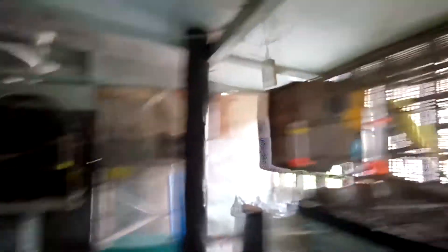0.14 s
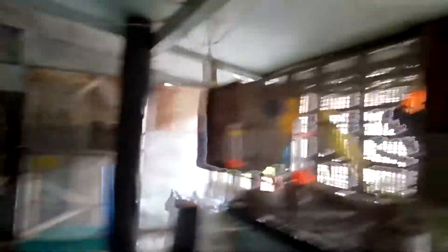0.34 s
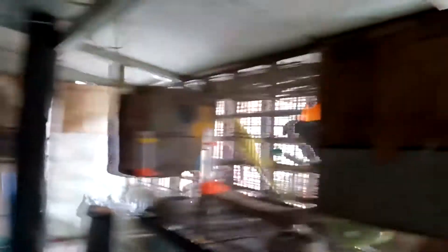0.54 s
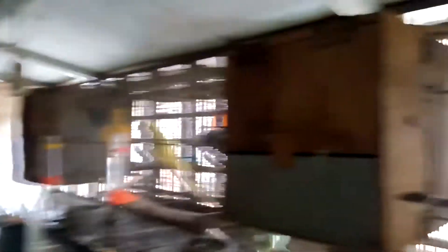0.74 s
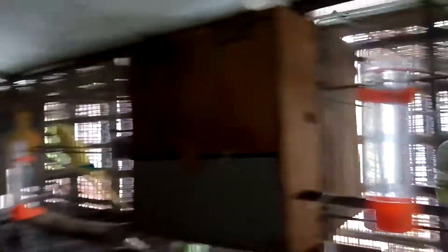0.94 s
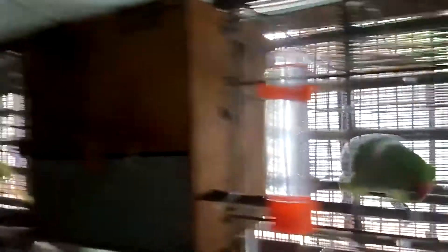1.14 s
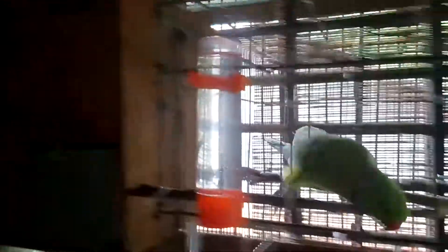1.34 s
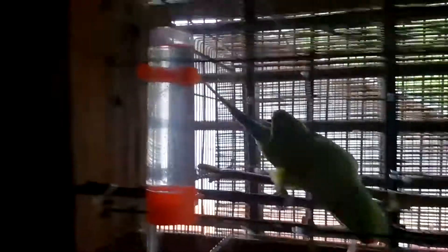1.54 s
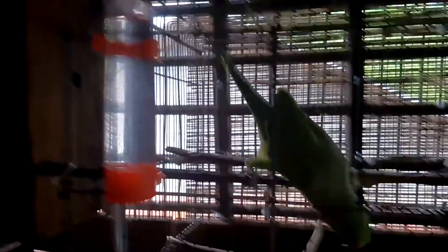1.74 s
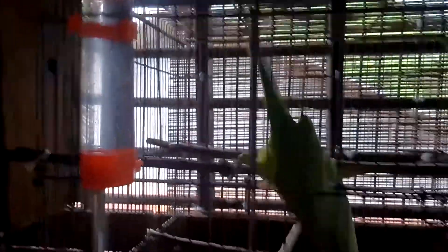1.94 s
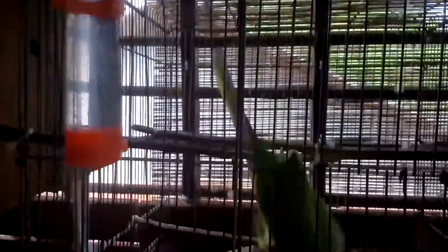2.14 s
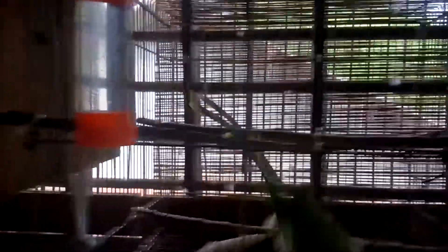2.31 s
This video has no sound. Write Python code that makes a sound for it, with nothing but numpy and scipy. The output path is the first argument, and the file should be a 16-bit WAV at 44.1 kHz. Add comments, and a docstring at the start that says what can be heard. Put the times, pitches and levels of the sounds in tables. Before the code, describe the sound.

Two piercing, raspy parakeet squawks in a hard-walled aviary, followed by a fainter bird call and distant barks

```python
"""In a hard-walled aviary a parakeet squawks twice and a second bird answers with a clearer call.
A dog barks far off, claws tick on cage wire, and a low rumble with hiss lies below.
Birds and dog are stacks of harmonics with breath noise; ticks are short rings; the bed is banded noise.
Two spaced microphones hear it; the recorder's gain control ducks everything under the squawks."""
import sys
import numpy as np
from scipy import signal
from scipy.fft import rfft, irfft, next_fast_len
from scipy.io import wavfile
from scipy.ndimage import uniform_filter1d

SR = 44100
rng = np.random.default_rng(int(sys.argv[2]) if len(sys.argv) > 2 else 0)


def dump(signal):
    """Clip the signal to [-1, 1] and save it as 16-bit WAV at the path in sys.argv[1]."""
    limited = np.clip(np.atleast_2d(signal).T, -1, 1)
    pcm = np.round(limited * 32767).astype(np.int16)
    wavfile.write(sys.argv[1], SR, pcm)


N = 104649  # samples
LEAD_S = .1


def amp(db):
    """Decibels to linear gain."""
    return 10 ** (np.asarray(db) / 20)


def rms_one(x):
    """Scale to an RMS of 1."""
    return x / np.sqrt(np.mean(x ** 2) + 1e-20)


def at_hz(points, hz):
    """Read a curve of (frequency, value) points, straight along log frequency."""
    points_hz, values = np.transpose(points)
    return np.interp(np.log(np.maximum(hz, 1)), np.log(np.maximum(points_hz, 1)), values)


def clock():
    """Time axis in seconds, starting a little early so that the room is already ringing."""
    return np.arange(-int(LEAD_S * SR), N) / SR


def drift(hz, size):
    """Slow random motion: noise through a double one-pole low-pass, spread about 1."""
    r = np.exp(-2 * np.pi * hz / SR)
    settle = SR // 4
    noise = rng.standard_normal(size + settle)
    return rms_one(signal.lfilter([1], [1, -2 * r, r * r], noise)[settle:])


def colour(x, db_at, lag_s=0.):
    """Shape the spectrum by a gain curve and delay the sound."""
    size = next_fast_len(x.shape[-1] + 2048)
    hz = np.fft.rfftfreq(size, 1 / SR)
    delay = np.exp(-2j * np.pi * hz * lag_s)
    return irfft(rfft(x, size) * amp(db_at(hz)) * delay, size)[..., :x.shape[-1]]


NOTE_EDGE_S, WAVER_HZ = 0.0029, 70
JITTER_TURNS, JITTER_HZ, PULSE_DB, PULSE_HZ = .14, 300, 8, 400  # depths at full roughness


def voice(rows, orders, waver, breath_db):
    """Harmonics on a pitch curve; roughness shakes the phase and pulses the level; breath hisses along."""
    t = clock()
    s, *columns = np.transpose(rows)
    on = (t >= s[0]) & (t < s[-1])
    hz, db, rough, slope_db = [np.interp(t[on], s, c) for c in columns]
    rough, size = np.clip(rough, 0, 1), on.sum()

    # phase in turns: the wavering pitch added up, then shaken
    wavering_hz = hz * (1 + waver * drift(WAVER_HZ, size))
    turns = np.cumsum(wavering_hz) / SR + JITTER_TURNS * rough * drift(JITTER_HZ, size)

    k, order_db = np.transpose(orders)[:, :, None]
    gains = amp(order_db + slope_db * (k - 1)) * (k * hz < .45 * SR)
    even_power = np.sqrt(2 / np.sum(gains ** 2, axis=0))  # slope changes timbre, not loudness
    tone = np.sum(gains * np.sin(2 * np.pi * k * turns), axis=0) * even_power
    tone += amp(breath_db) * rng.standard_normal(size)

    edge = np.clip(np.minimum(t[on] - s[0], s[-1] - t[on]) / NOTE_EDGE_S, 0, 1)
    pulse_db = PULSE_DB * rough * (np.tanh(drift(PULSE_HZ, size)) - 1.0)  # only ever lowers the level
    out = np.zeros(len(t))
    out[on] = tone * edge * amp(db + pulse_db)
    return out


# Notes of the two squawks, the voice jumping between registers; level is before roughness lowers it:
# start_s, pitch_hz, level_db, roughness (0-1), overtone_slope_db (per harmonic)
SQUAWK_NOTES = [
    [(-.1, 1351, 9, 0, 3), (-.03, 1893, 0, 0.85, -19), (-.01, 2601, 15, 0.9, -4.5)],
    [(-.01, 3590, 3, 0.2, 1.5), (.015, 3618, -8, 0.2, -1.5), (.035, 3884, 14, 0.25, -0.5)],
    [(.03, 5000, -9, 0.1, -19), (.044, 5213, 6, 0.07, -11), (.064, 5140, 4.5, 0.3, 5),
     (.072, 5020, 1.5, 0.4, -5), (.084, 4720, -6, 0.2, -4), (.095, 3740, -1, .35, 5.5)],
    [(.097, 3786, -0.5, 0.16, 3), (.115, 3613, -1, 0.17, -17), (.132, 3624, -3, 0.17, 3.5),
     (.155, 3422, 0, 0.22, -21)],
    [(.152, 3235, 11.5, 0.65, 3.5), (.175, 2550, -7.5, 0.9, -2.5), (.2, 2216, 4, 0.94, -2),
     (.225, 1807, -5, 0.77, 1), (.24, 1760, -16, 0.9, -13.5)],
    [(.421, 734, -11, 0.9, -3.5), (.432, 1187, -18.5, 0.86, -0.5), (.445, 1320, -5, 0.7, 0),
     (.47, 1334, -7, 0.7, -1), (.485, 1857, 6.5, 0.72, 0.5), (.5, 2367, -1, 0.67, -2.5),
     (.512, 2450, 1.5, 0.45, -3.5), (.523, 2567, 11.5, 0.54, 2.5)],
    [(.525, 3427, -9.5, 0.2, -4), (.55, 3390, -2.5, 0.2, -7), (.562, 3402, 3.5, 0.2, -11),
     (.572, 3240, 6, .15, -12)],
    [(.572, 2510, 6.5, 0.17, -1.5), (.596, 2208, -1.5, 0, -1.5), (.62, 2026, -2.5, 0.29, -0.5),
     (.64, 1831, -3.5, 0, -2), (.655, 1743, -5, 0.37, 0), (.672, 1557, -7, 0.42, -2)],
]
# Colour of throat, beak and microphone: frequency_hz, gain_db
SQUAWK_COLOUR = [(600, -24), (1300, -16), (2400, -12.5), (3500, 6), (5000, 2.5), (6600, -3.5), (7500, -13),
                 (10500, -19), (12500, -38), (14000, -29), (15200, -15)]
SQUAWK_WAVER, SQUAWK_BREATH_DB = .011, -21  # share of pitch; turbulence against the voice


def parakeet():
    """Two squawks of up to twelve harmonics; all notes share one colour of throat, beak and microphone."""
    even = [(k, 0) for k in range(1, 13)]
    notes = sum(voice(rows, even, SQUAWK_WAVER, SQUAWK_BREATH_DB) for rows in SQUAWK_NOTES)
    return colour(notes, lambda hz: at_hz(SQUAWK_COLOUR, hz))


# Answering call in two notes; level is before roughness lowers it:
# start_s, pitch_hz, level_db, roughness (0-1), overtone_slope_db (per harmonic)
ANSWER_NOTES = [
    [(.74, 1408, -38, 0.2, -30), (.755, 1388, -35.5, 0.2, -4), (.79, 1341, -29.5, 0.1, -0.5),
     (.814, 1327, -23, .06, 0.5), (.846, 1352, -26, 0.11, -0.5), (.862, 1377, -19, 0.14, -0.5)],
    [(.858, 1377, -25.5, 0.19, -2), (.874, 1423, -25.5, 0.07, -0.5), (.914, 1394, -18, .06, 1.5),
     (.94, 1418, -29.5, 0, -20.5), (.955, 1410, -18.5, 0.12, -0.5), (.975, 1311, -31, 0.12, -3.5),
     (.99, 1278, -30.5, 0.1, -7)],
]
# Harmonic mix before and after the step up in pitch: harmonic (number), gain_db
ANSWER_HARMONICS = [
    [(1, -14.5), (2, -6.5), (3, 0.5), (4, 2.5), (5, -11), (6, -15), (7, -23.5), (8, -49)],
    [(1, -21), (2, 1.5), (3, -7.5), (4, -4), (5, -15.5), (6, -22.5), (7, -46), (8, -38)],
]
ANSWER_WAVER, ANSWER_BREATH_DB = .004, -42  # share of pitch; turbulence against the voice


def answering_bird():
    """A steadier, less breathy voice whose harmonic mix changes with the second note."""
    return sum(voice(rows, orders, ANSWER_WAVER, ANSWER_BREATH_DB)
               for rows, orders in zip(ANSWER_NOTES, ANSWER_HARMONICS))


# Far barks, pitch and level at the top of the arch, before roughness lowers the level:
# start_s, length_s, pitch_hz, level_db
BARKS = [(0.723, 0.065, 641, -42), (0.952, 0.13, 608, -44), (1.199, 0.12, 618, -44.5),
         (1.511, 0.093, 589.4, -47.5), (1.785, 0.084, 629.7, -46.5), (2.075, 0.065, 587, -48.5)]
# Harmonic mix of a bark: harmonic (number), gain_db
BARK_HARMONICS = [(1, 0), (2, -6), (3, -5), (4, -20)]
BARK_ARCH, BARK_ROUGH = .05, .28  # pitch rises and sags by this share; roughness 0-1
BARK_WAVER, BARK_BREATH_DB = .016, -36  # share of pitch; turbulence against the voice


def dog():
    """Each bark arches in pitch and level, with a quick rise and a longer fall."""
    out = 0
    for s, length_s, hz, db in BARKS:
        end_hz = hz * (1 - BARK_ARCH)
        arch = [(s, end_hz, db - 15.5, BARK_ROUGH, 0),
                (s + 0.21 * length_s, hz, db, BARK_ROUGH, 0),
                (s + length_s, end_hz, db - 5.5, BARK_ROUGH, 0)]
        out = out + voice(arch, BARK_HARMONICS, BARK_WAVER, BARK_BREATH_DB)
    return out


# Claws on wire, level of the ring at its start: start_s, level_db, ring_hz
TICKS = [(1.2376, -56, 4800), (1.7384, -40.5, 6440), (1.802, -39, 5260), (1.9734, -49, 4400),
         (2.0962, -40, 4770), (2.156, -38.5, 6800)]
TICK_T60_S = .008


def ticks():
    """A click of noise and a short ring of the wire, dying together."""
    t, out = clock(), 0
    for s, db, hz in TICKS:
        age = np.maximum(t - s, 0)
        fade = (t >= s) * amp(db - 60 * age / TICK_T60_S)
        out = out + fade * (np.sin(2 * np.pi * hz * age) + 0.23 * rng.standard_normal(len(t)))
    return out


# Tilt of the rumble and hiss, before the whole bed is set to its level: frequency_hz, gain_db
FLOOR = [(25, -18), (45, -22.5), (85, -5), (125, 1), (175, -10.5), (260, -11), (470, -19), (900, -18),
         (1300, -20), (2000, -27.5), (6400, -32), (7800, -49), (10500, -61.5), (12800, -67), (15200, -56)]
# Likeness of the two sides: frequency_hz, likeness (0-1)
FLOOR_LIKENESS = [(60, 0.97), (300, 0.86), (700, 0.68), (2000, 0.17), (6000, 0.31), (15000, .1)]
# Stereo balance of the bed, also used for barks and ticks: frequency_hz, left_minus_right_db
FLOOR_BALANCE = [(60, 2), (240, -1), (950, 0.5), (3770, -3), (15000, 11.5)]
FLOOR_DB = -36.5
LUMPS_DB, LUMPS_HZ, LUMPS_BELOW_HZ = 3.5, 15, 290  # depth, speed, and where they thin out
FLICKER_DB, FLICKER_HZ = .4, 3.8
# the hiss above this comes from the right, so left hears it later; the rumble reaches both at once
HISS_FROM_HZ, FLOOR_LAG_S = 600, 0.00041


def floor():
    """Half-octave bands of rumble and hiss; the bass comes in lumps and each band flickers slightly."""
    out, lumps = 0, drift(LUMPS_HZ, N)
    edges = 25 * 2 ** np.arange(0, 10, 1 / 2)
    white = rng.standard_normal((2, 2, N))
    for k, (low, high) in enumerate(zip(edges, edges[1:])):
        band_pass = signal.butter(2, [low, high], "band", fs=SR, output="sos")
        mid, side = signal.sosfilt(band_pass, white[k % 2])  # neighbouring bands use different noise
        hz = np.sqrt(low * high)
        alike = np.clip(at_hz(FLOOR_LIKENESS, hz), 0, 1)
        lumps_db = LUMPS_DB * lumps / (1 + (hz / LUMPS_BELOW_HZ) ** 2)
        gain = amp(lumps_db + FLICKER_DB * drift(FLICKER_HZ, N))
        band = gain * (np.sqrt(1 + alike) * mid + np.sqrt(1 - alike) * side * [[1], [-1]])
        if hz > HISS_FROM_HZ:
            band[0] = np.roll(band[0], int(FLOOR_LAG_S * SR))
        out = out + band
    out = colour(out, lambda hz: at_hz(FLOOR, hz) + at_hz(FLOOR_BALANCE, hz) * [[.5], [-.5]])
    return amp(FLOOR_DB) * rms_one(out)


ROOM_T60_S, ROOM_DULL_HZ, ROOM_GAP_S = 0.27, 11100, .002
EARLY_T60_S, TAIL_DB = .08, -14  # the nearest walls answer first and loudest


def placed(x, lag_s, wet_db, balance):
    """Direct sound at both microphones plus a dying, dulled scatter of reflections, another on each side."""
    age = np.arange(int(.6 * SR)) / SR
    decay = amp(-60 * age / EARLY_T60_S) + amp(TAIL_DB - 60 * age / ROOM_T60_S)
    white = rng.standard_normal((2, len(age))) * (age > ROOM_GAP_S) * decay
    echo = signal.sosfilt(signal.butter(1, ROOM_DULL_HZ, fs=SR, output="sos"), white)
    echo *= amp(wet_db) / np.sqrt(np.sum(echo ** 2, axis=1, keepdims=True))
    direct = np.array([colour(x, np.zeros_like, lag_s), x])  # left hears later
    both = direct + signal.fftconvolve(x[None], echo, axes=1)[:, :len(x)]
    return colour(both, lambda hz: at_hz(balance, hz) * [[.5], [-.5]])[:, -N:]  # drop the lead


# Stereo balance of both birds: frequency_hz, left_minus_right_db
BIRD_BALANCE = [(60, 8.5), (130, 12), (290, 1), (640, 12.5), (1410, 12.5), (3100, -4.5), (6820, 5.5),
                (15000, 12)]
PARAKEET_LAG_S, ANSWER_LAG_S = 0.000319, 0.000313
PARAKEET_WET_DB, ANSWER_WET_DB, BARK_WET_DB, TICK_WET_DB = 2, 0, 3, -4  # reflections against direct


def scene():
    """Set birds, dog and claws in the room, over the rumble and hiss."""
    squawks = placed(parakeet(), PARAKEET_LAG_S, PARAKEET_WET_DB, BIRD_BALANCE)
    answer = placed(answering_bird(), ANSWER_LAG_S, ANSWER_WET_DB, BIRD_BALANCE)
    barks = placed(dog(), 0., BARK_WET_DB, FLOOR_BALANCE)
    claws = placed(ticks(), 0., TICK_WET_DB, FLOOR_BALANCE)
    return squawks + answer + barks + claws + floor()


# the release is the fall of the held level; the gain recovers at DUCK_SHARE of that rate
DUCK_FROM_DB, DUCK_SHARE, ATTACK_S, RELEASE_DB_PER_S = -20, 0.68, 0.003, 219.5
CUTOFF_HZ = 15760


def record(dry):
    """Gain control pulls loud passages down and lets go again; the top is cut."""
    t = np.arange(N) / SR
    power = uniform_filter1d(np.mean(dry ** 2, axis=0), size=441)  # 10 ms window
    level_db = 10 * np.log10(power.clip(1e-12))
    # peak hold that falls at the release rate
    held_db = np.maximum.accumulate(level_db + RELEASE_DB_PER_S * t) - RELEASE_DB_PER_S * t
    cut_db = DUCK_SHARE * np.maximum(held_db - DUCK_FROM_DB, 0)
    r = np.exp(-1 / (ATTACK_S * SR))
    cut_db = signal.lfilter([1 - r], [1, -r], cut_db, zi=[r * cut_db[0]])[0]
    top_cut = signal.cheby2(24, 70, CUTOFF_HZ, fs=SR, output="sos")
    return signal.sosfilt(top_cut, dry * amp(-cut_db))


dry = scene()
out = record(dry)
dump(out)
```